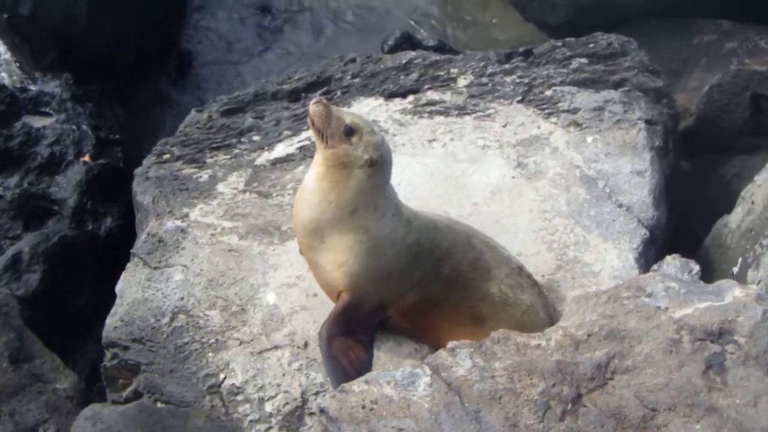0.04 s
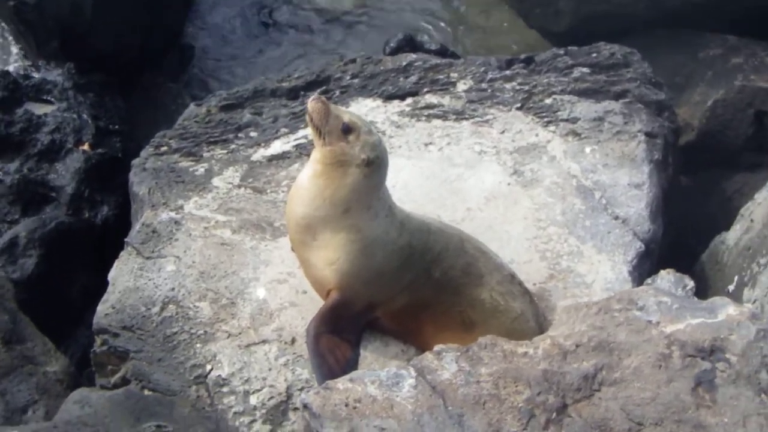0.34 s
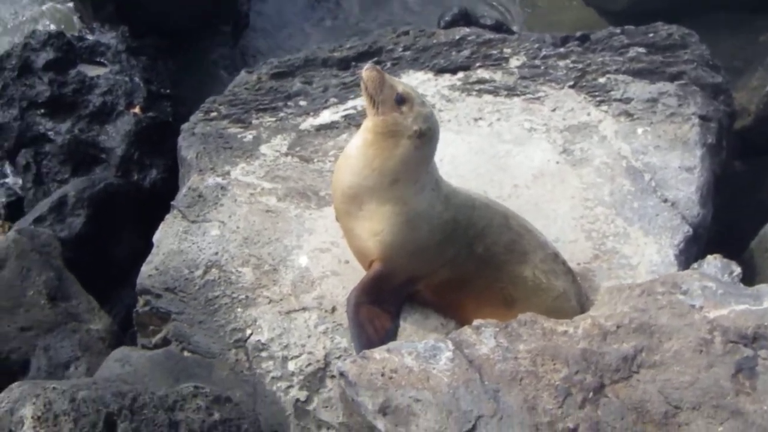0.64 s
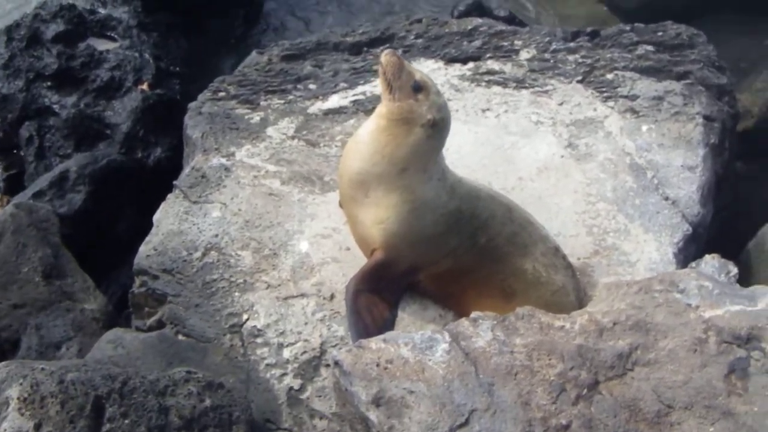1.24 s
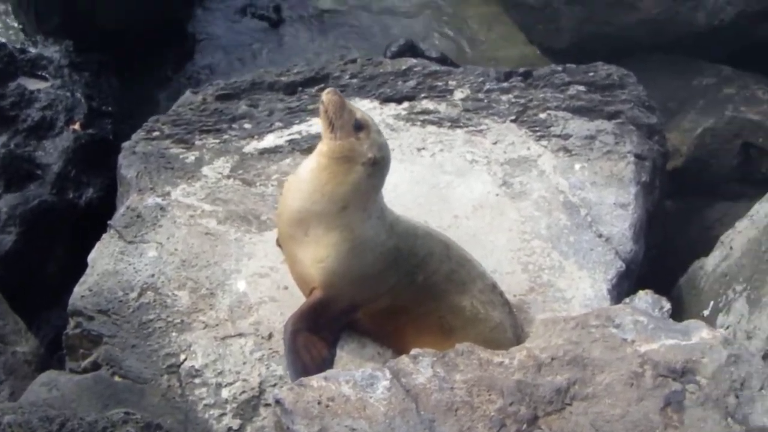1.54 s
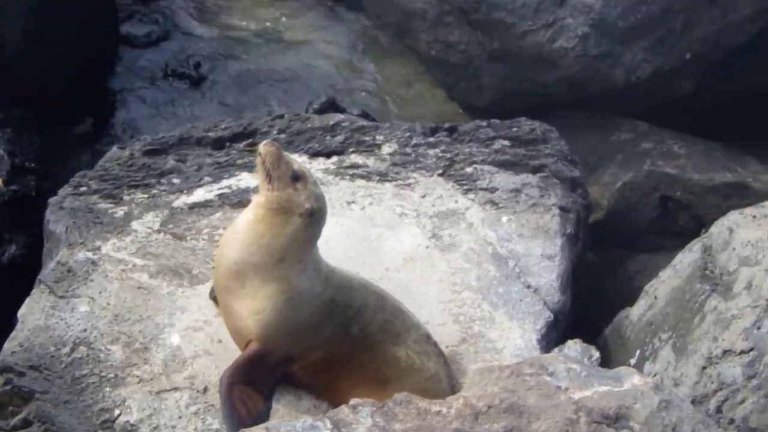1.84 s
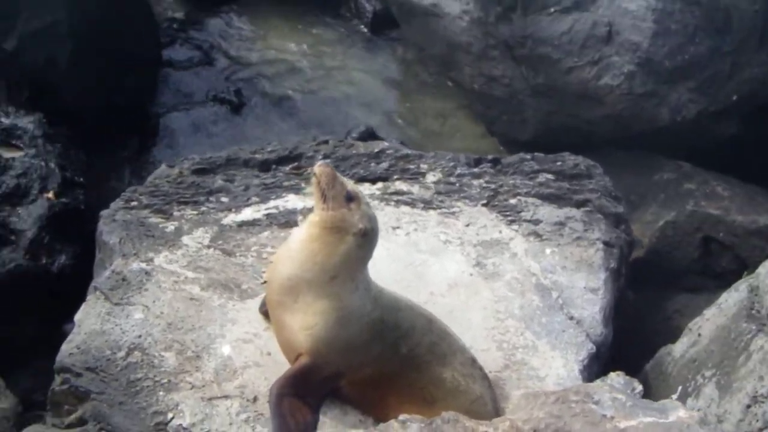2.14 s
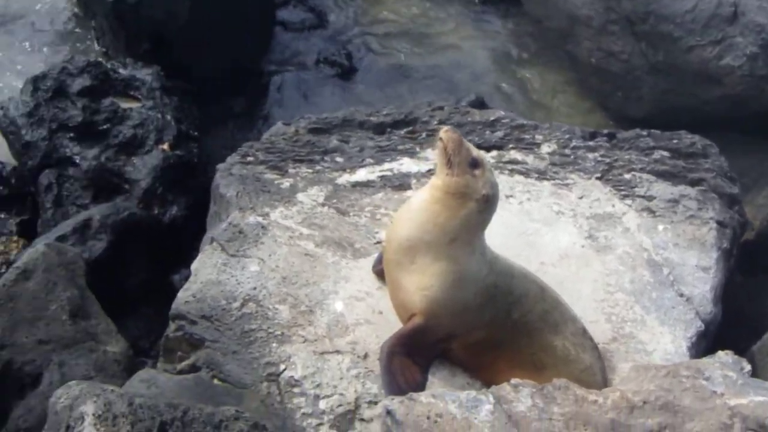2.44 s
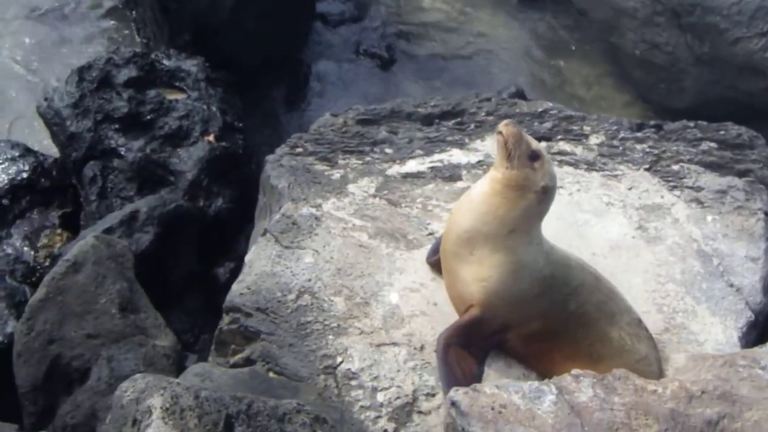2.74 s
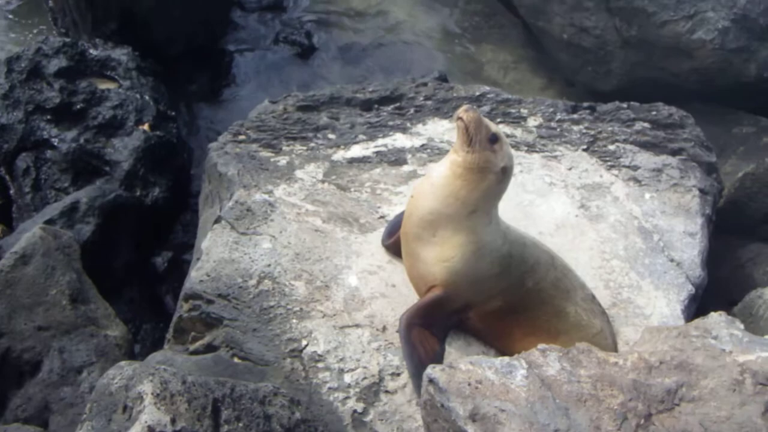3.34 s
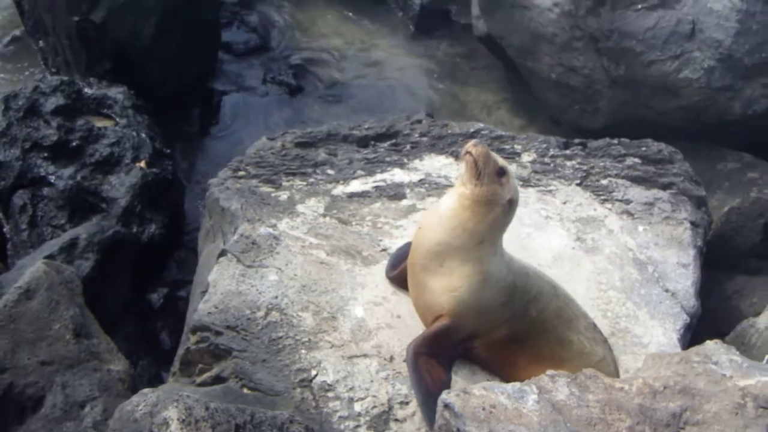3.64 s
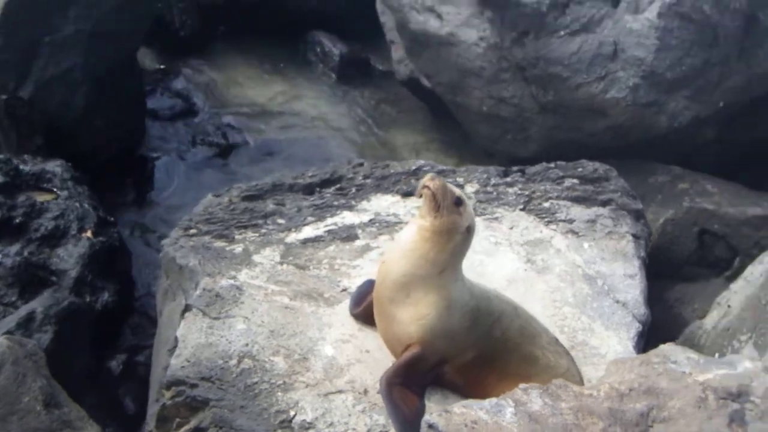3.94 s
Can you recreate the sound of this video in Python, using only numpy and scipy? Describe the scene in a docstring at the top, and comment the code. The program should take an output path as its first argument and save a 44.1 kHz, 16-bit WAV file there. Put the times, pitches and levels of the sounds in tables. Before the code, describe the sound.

Sea water hisses and bubbles between rocks on a shore, growing gradually louder. Gusts buffet the hand-held microphone, hardest early on, the camera body clicks now and then, and a puff of air thumps late.

```python
"""Surf washes among shore rocks: a swelling hiss of foam, with ringing bubbles, ticking spray and a
hollow resonance. It is heard through a small hand-held camera, where wind eddies beat on the
microphone port as flutter and single buffets over a low rumble. The camera body gives a few small
clicks and knocks, and near the end one hard puff of air thumps the microphone."""
import sys
import numpy as np
from scipy import signal
from scipy.fft import rfft, irfft
from scipy.io import wavfile
from scipy.ndimage import uniform_filter1d

SR = 44100
rng = np.random.default_rng(int(sys.argv[2]) if len(sys.argv) > 2 else 0)


def int16_out(signal):
    """Quantize to a 16-bit WAV file."""
    q = np.round(np.clip(np.atleast_2d(signal).T, -1, 1) * 32767)
    wavfile.write(sys.argv[1], SR, q.astype(np.int16))


N = 176400

# surge of the water (t/s, level/dB)
SURGE = [(0.05, -40.5), (.33, -38), (.6, -32), (.8, -30.5), (.99, -30.5), (1.25, -32.5), (1.46, -30.3),
         (1.9, -31.5), (2.3, -31.5), (2.62, -31), (2.77, -32), (2.88, -30.5), (3.15, -27.5), (3.23, -29),
         (3.58, -26), (3.73, -30.5), (3.83, -27), (4, -25.5)]
# filter that colours the surf (f/Hz, gain/dB)
SURF_COLOUR = [(60, -38), (150, -14), (280, -8.5), (430, -4.5), (600, -0.5), (760, -4.5), (900, -12),
               (1030, -3), (1200, -6), (1380, -5), (1800, -5.5), (2600, -8.5), (3400, -6), (4300, -3),
               (5600, -12), (6200, -15), (7000, -14.5), (7800, -23.5), (8700, -32), (9700, -25),
               (10800, -25.5), (13000, -34), (15500, -40)]
# gusts at the microphone (start t/s, duration/s, level/dB)
GUSTS = [(0.001, 0.0297, -23.5), (.28, 0.22, -40.5), (.53, .1, -33.5), (0.635, .052, -22.5),
         (0.731, 0.061, -21.5), (0.79, .03, -23), (0.812, 0.044, -18), (0.864, 0.065, -22.5),
         (1.353, 0.22, -37.5), (1.441, 0.15, -29), (1.776, 0.058, -30.5), (1.837, 0.24, -39.5),
         (2.583, 0.1, -31.5), (2.788, 0.038, -26), (2.816, 0.065, -24), (2.917, 0.08, -33.5),
         (3.077, .05, -30.5), (3.385, .2, -35)]
# spectrum of the flutter in the port (f/Hz, relative level/dB)
FLUTTER_COLOUR = [(30, -40), (80, -22.5), (160, -8), (270, -4.5), (380, -1.5), (500, -2), (650, -10.5),
                  (820, -20), (1130, -13.5), (1500, -35.5), (3000, -63), (12000, -92)]
# envelope of the wind rumble (t/s, level/dB)
RUMBLE_LEVEL = [(0, -47), (.4, -49), (.8, -46.5), (1.6, -43), (2.4, -45.5), (3.0, -41), (3.4, -41.5),
                (4, -48)]
# spectrum of the wind rumble (f/Hz, relative level/dB)
RUMBLE_COLOUR = [(10, -19), (24, -7), (35, -7), (50, -6.5), (75, -17.5), (150, -21.5), (400, -56),
                 (3000, -87)]
# sharp clicks of the camera body (t/s, peak level/dB, f/Hz)
CLICKS = [(0.0225, -7, 4730), (0.458, -21, 6800), (.4725, -28, 8150), (0.4773, -26, 9600),
          (1.444, -12.5, 4680), (1.658, -23, 7000), (2.205, -21, 5400), (3.054, -22.5, 10200),
          (3.666, -16, 5650), (3.7452, -23.5, 10500), (3.793, -20, 11900)]
# single strong eddies (t/s, envelope peak level/dB)
BUFFETS = [(0.031, -15), (0.041, -14), (0.131, -32), (.286, -22.5), (.341, -22.5), (.397, -22.5),
           (.537, -20), (0.593, -15), (.635, -10), (0.6654, -5.5), (.76, -14), (.811, -10.5), (.826, -8),
           (0.8461, -3.5), (0.897, -8.5), (1.252, -23.5), (1.421, -21), (1.48, -15.5), (1.499, -17),
           (1.56, -20), (1.798, -18.5), (2.566, -14.5), (2.675, -20.5), (2.84, -11.5), (2.867, -9.5),
           (2.977, -15), (3.2, -20), (3.413, -9.5), (3.419, -12)]
# light knocks on the camera body (t/s, envelope peak level/dB)
KNOCKS = [(0.48, -17.5), (3.643, -19.5)]


def undb(db):
    """Amplitude ratio of a level in decibels."""
    return 10 ** (np.asarray(db) / 20)


def unit(x):
    """Normalisation to rms 1."""
    return x / np.sqrt(np.mean(x ** 2) + 1e-20)


def curve(rows):
    """Linear interpolation of (t/s, value) rows at every sample."""
    return np.interp(np.arange(N) / SR, *np.array(rows).T)


def colour(x, points):
    """Minimum-phase filtering with a (f/Hz, gain/dB) response."""
    hz, db = np.array(points).T
    f = np.maximum(np.arange(N // 2 + 1) * SR / N, 1)
    gain = undb(np.interp(np.log(f), np.log(hz), db))
    cepstrum = irfft(np.log(gain), N)
    cepstrum[1:N // 2] *= 2  # folding onto positive time makes the filter causal
    cepstrum[N // 2 + 1:] = 0
    return irfft(rfft(x) * np.exp(rfft(cepstrum)), N)


def fluctuation(rate_hz):
    """Low-pass noise of rms 1: random steps, smoothed twice."""
    hold = int(SR / rate_hz)
    steps = rng.standard_normal(1024)[np.arange(N) // hold]
    return unit(uniform_filter1d(uniform_filter1d(steps, hold), hold))


def add(out, start, sound):
    """Superposition of a sound from a start time in seconds."""
    i = int(np.clip(start * SR, 0, N - 1))
    out[i:i + len(sound)] += sound[:N - i]


def impacts(per_s, spread_db):
    """A Poisson train of impulses, many weak and a few strong."""
    size = undb(spread_db * np.minimum(rng.exponential(size=N), 6))
    return (rng.random(N) < per_s / SR) * size * rng.choice([-1, 1], N)


def ring(hz, rise_s):
    """Damped resonance, softly struck: the envelope swells to 1 at rise_s, then dies."""
    t = np.arange(SR // 20) / SR
    envelope = (t / rise_s) ** 2 * np.exp(2 - 2 * t / rise_s)
    return envelope * np.sin(2 * np.pi * hz * t)


def spray(cutoff_hz=6840):
    """Shot noise: the brief impacts of spray tick in the treble."""
    highpass = signal.butter(2, cutoff_hz, "high", fs=SR, output="sos")
    return signal.sosfilt(highpass, impacts(per_s=1000, spread_db=3))


def wash(flicker_db=1.32):
    """Incoherent addition blurs distant foam into noise; each half-octave band flickers on its own."""
    spectrum, out = rfft(rng.standard_normal(N)), 0
    f = np.maximum(np.arange(len(spectrum)) * SR / N, 1)
    half_octaves = 2 * np.log2(f / 60)
    for k in range(17):
        band = irfft(spectrum * np.maximum(1 - abs(half_octaves - k), 0), N)
        out += band * undb(flicker_db * fluctuation(rate_hz=26.05))
    return unit(out)


def bubbles(per_s=3000, quality=14.7, rise=.15, spread_db=2.5):
    """Each nearer bubble is a damped oscillator whose pitch rises as it rings."""
    out = np.zeros(N)
    draws = rng.random((20000, 3))
    for when, smallness, chance in draws[:int(per_s * N / SR)]:
        hz = 450 + 12000 * smallness ** 2
        life_s = quality / hz
        age = np.arange(int(2 * life_s * SR)) / (life_s * SR)  # in lifetimes
        gain = undb(-spread_db * np.log(max(chance, .005))) * hz * np.sqrt(smallness + .1)
        phase = 2 * np.pi * quality * age * (1 + rise * age / 2)
        add(out, when * N / SR, gain * np.exp(-np.pi * age) * np.sin(phase))
    return unit(out)


def surf(spray_db=-10.5, wash_db=0.16, bubble_db=-3.5, slosh_db=0.77):
    """Common amplitude modulation: spray, wash and bubbles swell together with the surge."""
    layers = [(spray(), spray_db), (wash(), wash_db), (bubbles(), bubble_db)]
    water = sum(undb(db) * unit(colour(x, SURF_COLOUR)) for x, db in layers)
    return water * undb(curve(SURGE) + slosh_db * fluctuation(rate_hz=20))


def hollow(hz=1161, stage_width_hz=193, mean_db=-37, follow=0.91):
    """A hollow resonance selects one band of the water's noise, which swells less than the surge."""
    b, a = signal.iirpeak(hz, hz / stage_width_hz, fs=SR)
    band = signal.lfilter(b, a, signal.lfilter(b, a, rng.standard_normal(N)))
    surge_db = curve(SURGE)
    return unit(band) * undb(mean_db + follow * (surge_db - surge_db.mean()))


def flutter(breeze_db=-48.5, edge_s=0.0069):
    """Turbulent pressure: eddies beat on the microphone port, hard in gusts and faintly between."""
    t = np.arange(N) / SR
    force = undb(breeze_db)
    for start, length, db in GUSTS:
        inside_s = np.minimum(t - start, start + length - t)
        gate = np.clip(inside_s / edge_s + .5, 0, 1)
        force = np.maximum(force, undb(db) * gate)
    eddies = colour(impacts(per_s=600, spread_db=2.5), FLUTTER_COLOUR)
    running_rms = np.sqrt(uniform_filter1d(eddies ** 2, size=1800) + 1e-12)
    return force * eddies / running_rms


def rumble():
    """Wind turbulence carries most of its energy at low frequencies."""
    return undb(curve(RUMBLE_LEVEL)) * unit(colour(rng.standard_normal(N), RUMBLE_COLOUR))


def clicks(decay_s=.0012, bandwidth_ratio=0.28):
    """Transient excitation: short noise bursts drive bright resonances of the camera body."""
    out, t = np.zeros(N), np.arange(SR // 50) / SR
    for start, db, hz in CLICKS:
        burst = rng.standard_normal(len(t)) * np.exp(-t / decay_s)
        b, a = signal.iirpeak(hz, 1 / bandwidth_ratio, fs=SR)
        click = signal.lfilter(b, a, signal.lfilter(b, a, burst))
        add(out, start, undb(db) * click / abs(click).max())
    return out


def buffets(port_hz=424, reference_db=-11.5, hz_per_db=6.5):
    """Single eddies excite the resonance of the port; stronger ones ring higher."""
    out = np.zeros(N)
    for start, db in BUFFETS:
        hz = port_hz + hz_per_db * (db - reference_db)
        add(out, start, undb(db) * ring(hz, rise_s=.0021))
    return out


def knocks():
    """Light knocks set one damped mode of the camera body into free vibration."""
    out = np.zeros(N)
    for start, db in KNOCKS:
        add(out, start, undb(db) * ring(hz=1197, rise_s=0.0028))
    return out


def thump(start_s=3.642, period_s=0.0037, decay_s=0.0029, gain_db=-1):
    """A hard puff is one damped pressure cycle: a push of air, then a weaker pull."""
    out, t = np.zeros(N), np.arange(int(period_s * SR)) / SR
    pulse = np.sin(2 * np.pi * t / period_s) * np.exp(-t / decay_s)
    add(out, start_s, undb(gain_db) * pulse)
    return out


def scene():
    """Superposition of water, wind and camera sounds in one channel."""
    return (surf() + hollow() + flutter() + rumble() + clicks() + buffets() + knocks() + thump())[None]


def record(dry):
    """Band limiting: the camera cuts the treble steeply above 15750 Hz."""
    return signal.sosfilt(signal.ellip(10, .2, 80, 15750, fs=SR, output="sos"), dry)


dry = scene()
out = record(dry)
int16_out(out)
```